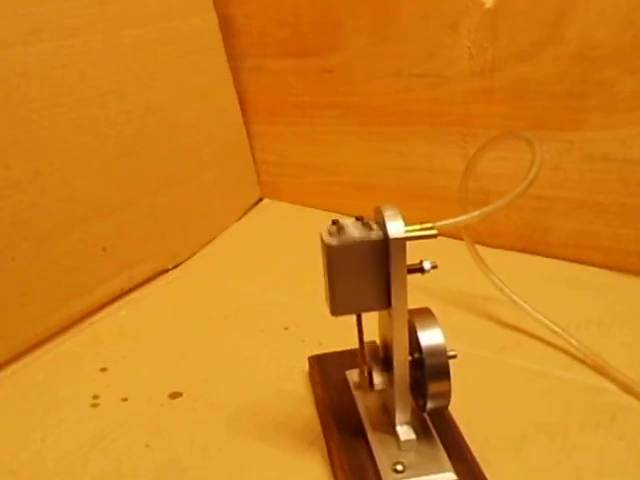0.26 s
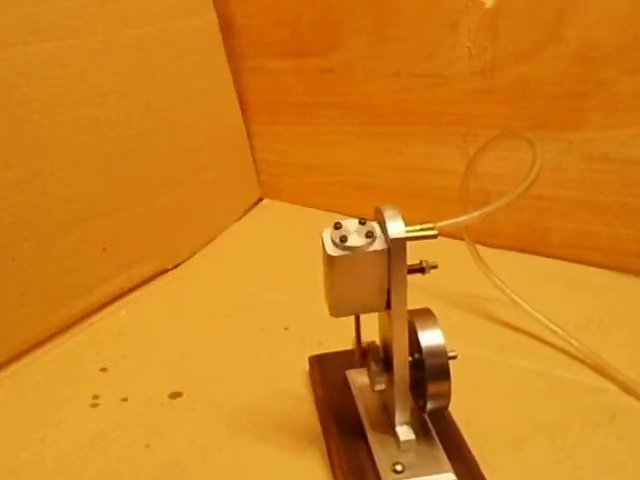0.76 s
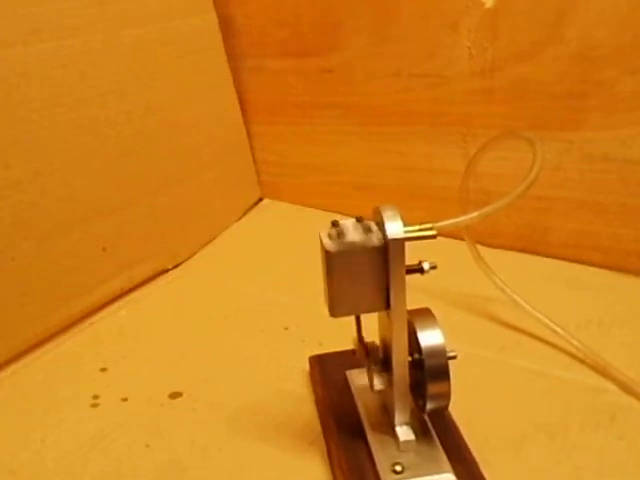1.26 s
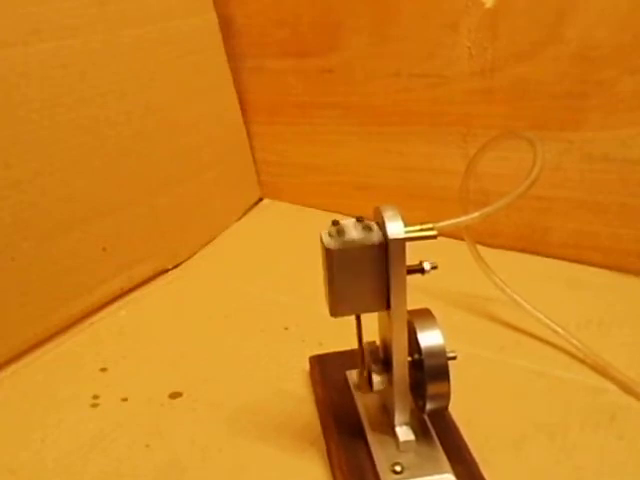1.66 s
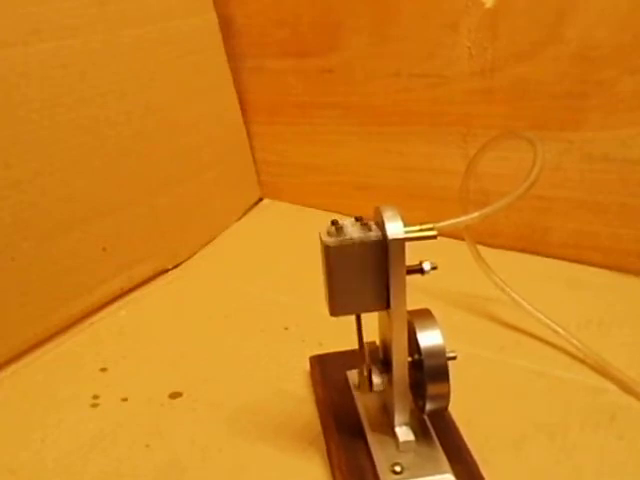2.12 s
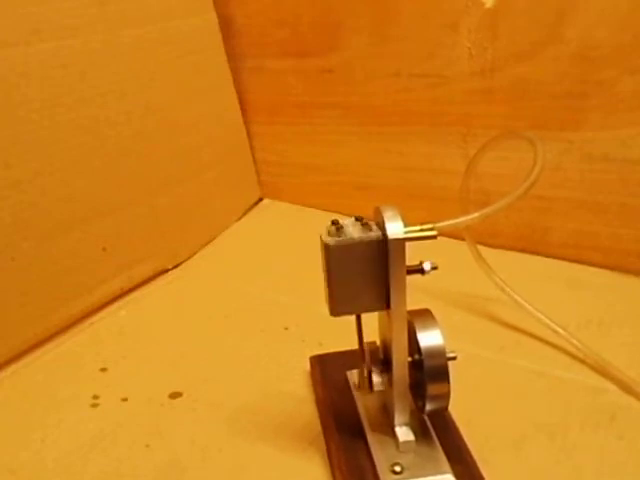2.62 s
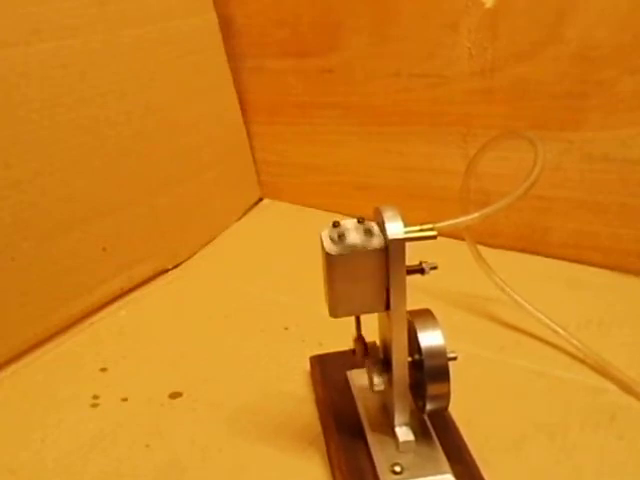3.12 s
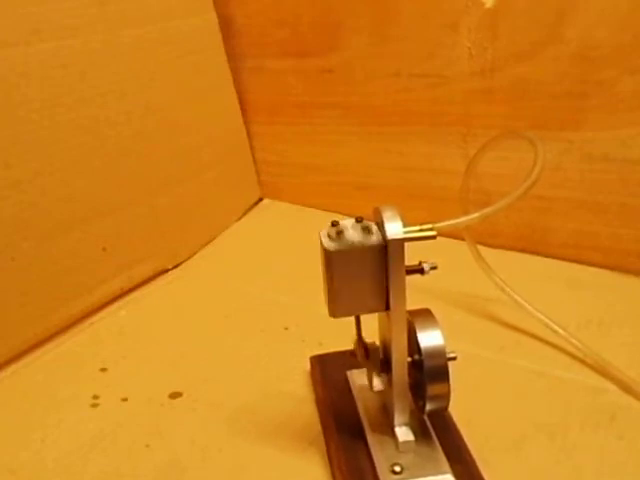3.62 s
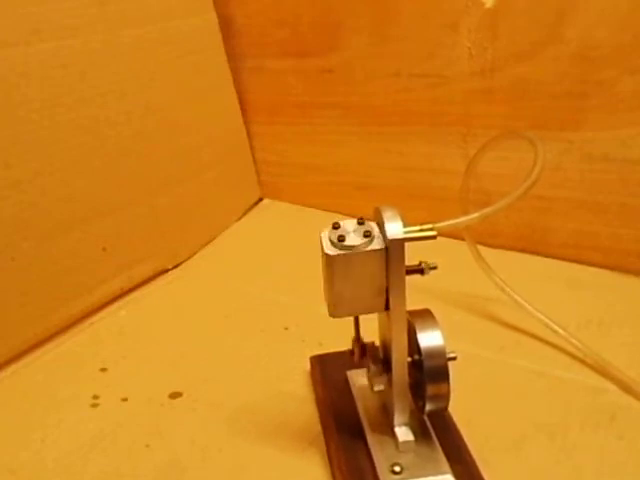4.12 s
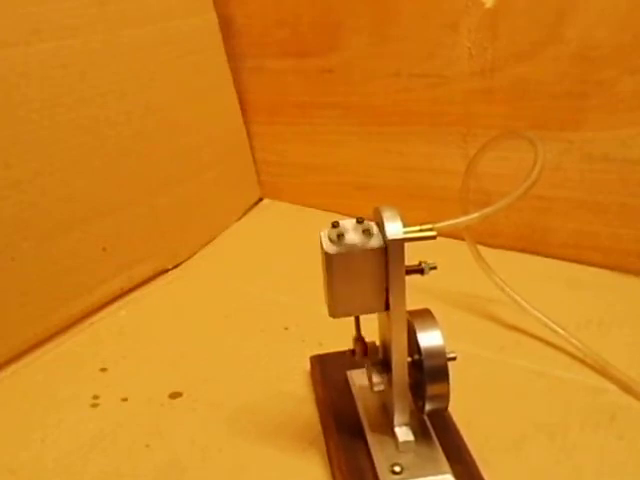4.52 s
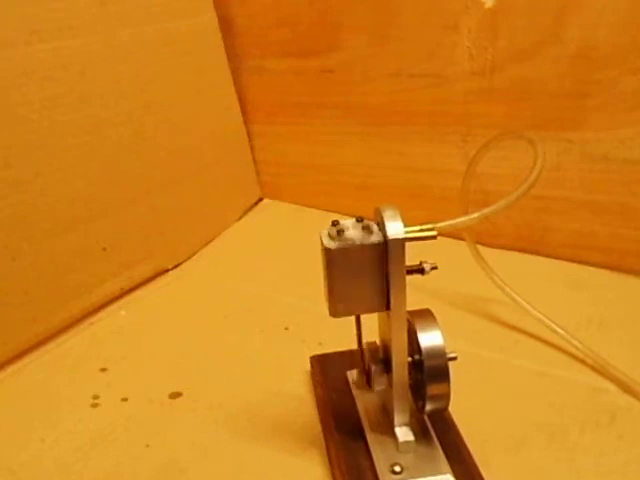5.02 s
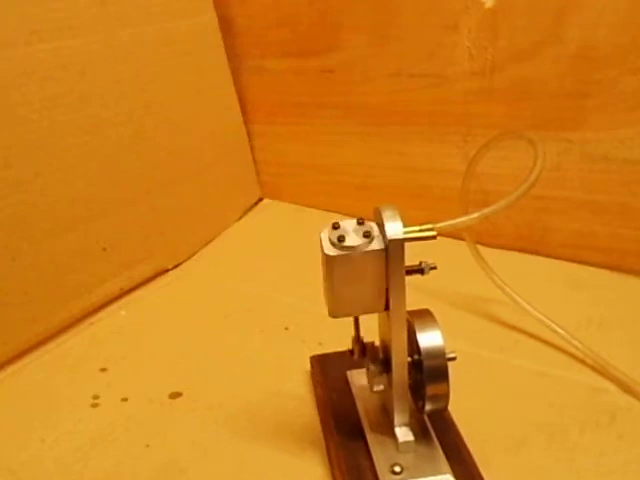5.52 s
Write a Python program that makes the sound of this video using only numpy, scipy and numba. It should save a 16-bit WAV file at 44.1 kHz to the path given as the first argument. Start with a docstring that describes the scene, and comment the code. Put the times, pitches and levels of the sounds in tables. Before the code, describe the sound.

A small metal steam engine runs close to the microphone in a boxed-in wood and cardboard corner. Rapid airy puffs, bright leaking hiss and loose crank clatter blend at nearly nine turns a second. After about two seconds it slows and the hiss weakens, leaving separate knocks and ticks at around five a second. Peaks are crunchy and overloaded; a low rush and faint high whine sit behind.

```python
"""In a corner of wood and cardboard a small oscillating-cylinder steam engine slows from nine to five turns a second.
Steam flow is shaped noise: each turn the exhaust port lets out a puff, and the port face leaks a hiss
whose whistle follows the piston through a moving resonance. The loose crank and pivot knock and tick:
flurries of contacts excite decaying modes. The close microphone overloads on the peaks;
a low rush and a thin steady whine lie behind."""
import sys
import numpy as np
from scipy import signal
from scipy.fft import rfft, irfft
from scipy.io import wavfile
from scipy.ndimage import uniform_filter1d
from numba import njit

SR = 44100
rng = np.random.default_rng(int(sys.argv[2]) if len(sys.argv) > 2 else 0)


def transcribe(signal):
    """Save signal, clipped to [-1, 1], as a 16-bit WAV file at the path in sys.argv[1]."""
    frames = np.atleast_2d(signal).T
    limited = np.clip(frames, -1, 1)
    pcm = np.round(limited * 32767).astype(np.int16)
    wavfile.write(sys.argv[1], SR, pcm)


N = 254456
TIME = np.arange(N) / SR

# strength of the steam, relative levels: time_s, puff_db, leak_db
STEAM_STRENGTH = [(0, -19, -13), (.55, -17.5, -14), (.85, -23, -14), (1.15, -13.5, -14.8),
                  (1.9, -17, -16.3), (2.4, -21, -17), (2.8, -17, -18), (3.25, -21, -21.5), (4.2, -19, -22),
                  (4.8, -24, -22.3), (5.77, -21, -21)]


def exhaust(pace, level_db=14.0, sputter_db=5.0, lag_s=0.0015):
    """Blowdown: the opening port releases turbulent flow, a sputtering puff that comes later at speed."""
    # colour of the puff: frequency_hz, density_db (relative, per Hz)
    puff_spectrum = [(100, -8.5), (500, -26), (900, -5), (1300, -2.5), (2600, -8.5), (4500, -5),
                     (6800, 0.5), (8200, 6), (10000, 5), (12200, 3), (13500, -2), (15800, -4.5)]
    opens, _ = when_crank_reaches(0, 0)
    s, puff_db, _ = np.transpose(STEAM_STRENGTH)
    puffs = np.c_[opens, np.interp(opens, s, puff_db)]
    flow = bursts(strikes(puffs, spread_db=1.4), rise_s=0.0092, hold_s=.010, fall_s=0.0029)
    flow = np.interp(TIME - pace * lag_s, TIME, flow)
    sputter = from_db(level_db + sputter_db * drift(per_s=510))
    return flow * sputter * noise(puff_spectrum)


def leak(turn, pace, level_db=2.0, flutter_db=2.06):
    """Jet noise of the port face; the air space swept by the piston filters a whistle of moving pitch."""
    # leak through one turn, relative levels: turn_share, fast_db, slow_db
    leak_cycle = [(.07, 2.5, 3), (.21, -1.5, -3.5), (.33, -1.5, 0), (.44, 0, .5), (.56, -6, -3.5),
                  (.74, -5.5, -4.5), (.87, -4, -3.5), (.92, -12, -1.5), (.96, -18, -.5), (.985, -1, 3.5)]
    # colour of the leak: frequency_hz, density_db (relative, per Hz)
    leak_spectrum = [(100, -18), (500, -12), (900, -11), (1250, -8), (2250, -8), (2700, -10), (3100, -6),
                     (4000, -8.5), (6800, -3), (8400, 0.5), (10200, 1.2), (12500, 1), (15800, -8)]
    # resonance of the air space that the piston sweeps: turn_share, resonance_hz
    cavity = [(.03, 8300), (.2, 7800), (.4, 8100), (.5, 8550), (.6, 9400), (.68, 10000), (.78, 10250),
              (.86, 9750), (.94, 9200)]
    width_hz, whistle_db = 290, -4.5   # whistle level is relative to the plain hiss

    share, fast_db, slow_db = np.transpose(leak_cycle)
    fast_cycle_db = np.interp(turn, share, fast_db, period=1)
    slow_cycle_db = np.interp(turn, share, slow_db, period=1)
    cycle_db = pace * fast_cycle_db + (1 - pace) * slow_cycle_db
    s, _, leak_db = np.transpose(STEAM_STRENGTH)
    steam_db = np.interp(TIME, s, leak_db)
    flow = from_db(level_db + steam_db + cycle_db + flutter_db * drift(per_s=210))

    cavity_hz = np.interp(turn, *np.transpose(cavity), period=1)
    pole_radius = np.exp(-np.pi * width_hz / SR)
    whistle = moving_resonance(rng.standard_normal(N), 2 * np.pi * cavity_hz / SR, pole_radius)
    return flow * (noise(leak_spectrum) + from_db(whistle_db) * rms_one(whistle))


def knocks(turn, pace, ring_db=-3.5, crack_db=4.5, rattle_db=-20.0, rattles_per_s=140, cushion_hz=2500):
    """Impact in the crank's play excites frame modes, duller near the turn's end; at speed it rattles."""
    # frame and base, relative levels: mode_hz, level_db, t60_s
    frame_modes = [(962, -14.5, 0.03), (1143, -6.7, 0.03), (1321, -8, 0.044), (1423, -4.5, 0.02),
                   (1718, -8, 0.012), (1885, -1, 0.028), (2160, -0.5, 0.0067), (2253, -4, 0.037),
                   (3018, -4.7, 0.024), (3337, -4.5, 0.017), (3855, -11, 0.028), (4570, -11, 0.038),
                   (4680, -9, 0.028), (5370, -32, 0.0091), (5860, -14, 0.017), (7650, 1, 0.0085),
                   (8610, -8, 0.01)]
    # colour of the crack: frequency_hz, density_db (relative, per Hz)
    crack_spectrum = [(80, -5), (400, -7), (1000, 1), (2000, 8), (2700, -1.5), (5000, 9), (8500, -2.5),
                      (11000, -7), (15800, -17)]
    # now and then the crank stays seated through a return and the clatter lets up: time_s
    smooth_returns = [.565, 1.04, 1.155, 1.62, 2.875]
    smooth_s, smooth_db = .024, -20   # about half the length of such a lull, and its depth

    force, envelope = chatter(
        crank_blows(), first_db=-2.5, contacts_per_s=2500, rise_s=0.0012, hold_s=0.0032, fall_s=0.005)
    rattle = (rng.random(N) < pace * rattles_per_s / SR) * rng.standard_normal(N)
    frame = body(force + from_db(rattle_db) * rattle, frame_modes, spread_db=1.5)
    hard = from_db(ring_db) * frame + from_db(crack_db) * envelope * noise(crack_spectrum)

    # a softer contact loses its treble
    soft = signal.sosfilt(signal.butter(1, cushion_hz, fs=SR, output="sos"), hard)
    softness = (.5 + .5 * np.cos(2 * np.pi * turn)) ** 2
    lull = sum(np.exp(-((TIME - s) / smooth_s) ** 4) for s in smooth_returns)
    return from_db(smooth_db * lull) * (hard + softness * (soft - hard))


def crank_blows():
    """Kinematics of play: all knocks of crank and rod, as rows of time_s, level_db."""
    # Each contact made on every turn, with relative levels, lists:
    # flung_turn_share, seated_turn_share, flung_db, seated_db, scatter_s, scatter_db
    # the steam takes up the play in the crank
    push_knock = (.125, .14, -15.5, -28, .003, 2.5)
    # the end of the power stroke
    stroke_knock = (.422, .32, -11.5, -12.3, .001, 1.0)
    # a light touch just before it
    lead_knock = (.31, .2, -22, -33, .002, 3)
    # the rod shakes while it is unloaded
    coast_knock = (.75, .7, -22, -50, .004, 3.5)
    # the end of the return stroke
    return_knock = (.836, .877, -14, -13.3, .0005, 1.0)
    # odd knocks that stand out of the run, relative levels: time_s, level_db
    hard_knocks = [(.141, -4), (.482, -9), (1.335, -11), (1.501, -10.5), (1.533, -6), (1.977, -3),
                   (2.638, -6)]
    # the rod's early shaking gives way to one clean return knock, level changes:
    # time_s, return_knock_db, coast_knock_db
    settling = [(1.3, -8, 2), (1.7, 0, -8)]

    s, return_db, coast_db = np.transpose(settling)
    returns, coasts = every_turn(return_knock), every_turn(coast_knock)
    returns[:, 1] += np.interp(returns[:, 0], s, return_db)
    coasts[:, 1] += np.interp(coasts[:, 0], s, coast_db)
    stroke = [every_turn(contact) for contact in (push_knock, lead_knock, stroke_knock)]
    return np.vstack([*stroke, coasts, returns, hard_knocks])


def ticks(ring_db=0.0, snap_db=3.0):
    """Impact of steel on steel: the cylinder rocks against its pivot and excites short, bright modes."""
    # the cylinder rocks over, relative levels:
    # flung_turn_share, seated_turn_share, flung_db, seated_db, scatter_s, scatter_db
    pivot_tick = (.357, .254, -8, -8.5, .0004, 1.5)
    # odd ticks that stand out, relative levels: time_s, level_db
    hard_ticks = [(1.09, -5), (1.978, -4), (2.039, 1), (2.667, -7)]
    # cylinder and pivot, relative levels: mode_hz, level_db, t60_s
    steel_modes = [(1820, -17, 0.02), (4320, -15, 0.028), (5210, -9.5, 0.0098), (7860, -3, 0.015),
                   (8360, -1, 0.0076), (8640, 3.5, 0.0082), (9140, -2.5, 0.011)]
    # colour of the snap: frequency_hz, density_db (relative, per Hz)
    snap_spectrum = [(200, -23), (1500, -1), (2700, -5), (5000, -2), (6500, -7.5), (8500, 3), (11000, -9),
                     (15800, -10)]
    # the cylinder drops back after rocking over, more strongly at low speed
    rebound_s, rebound_seated_db, rebound_flung_db = .039, -17, -35

    s, flung = when_crank_reaches(*pivot_tick[:2])
    rebound_db = rebound_seated_db + flung * (rebound_flung_db - rebound_seated_db)
    blows = np.vstack([every_turn(pivot_tick), np.c_[s + rebound_s, rebound_db], hard_ticks])
    force, envelope = chatter(
        blows, first_db=5.0, contacts_per_s=2500, rise_s=0.00048, hold_s=0.0013, fall_s=0.0052)
    steel = body(force, steel_modes, spread_db=2.2)
    return from_db(ring_db) * steel + from_db(snap_db) * envelope * noise(snap_spectrum)


def crank():
    """Rotation: share of the turn since the exhaust opened, and pace from 0 (slow) to 1 (fast)."""
    slow_turns_per_s, fast_turns_per_s = 5.2, 6.8
    turns, turns_per_s = turns_done()
    pace = np.clip((turns_per_s - slow_turns_per_s) / (fast_turns_per_s - slow_turns_per_s), 0, 1)
    return turns % 1, pace


def turns_done():
    """Speed integrates to angle: turns since the exhaust first opened, and speed in turns per second."""
    # flywheel speed: time_s, speed_turns_per_s
    flywheel_speed = [(0, 8.794), (0.3, 8.795), (0.7, 8.569), (1.5, 8.459), (2.2, 8.304), (2.45, 7.586),
                      (2.75, 7.566), (3.0, 6.436), (3.3, 6.073), (3.7, 5.667), (4.1, 5.34), (4.5, 5.163),
                      (4.9, 4.994), (5.3, 5.069), (5.77, 4.62)]
    first_opening = .102   # share of a turn before the exhaust first opens
    turns_per_s = np.interp(TIME, *np.transpose(flywheel_speed))
    return np.cumsum(turns_per_s) / SR - first_opening, turns_per_s


def when_crank_reaches(flung_share, seated_share):
    """Inertia shifts contacts: times of a crank angle, and how far loose parts are flung in play (0-1)."""
    seated_turns_per_s, flung_turns_per_s = 6.3, 7.7
    turns, turns_per_s = turns_done()
    whole = np.arange(np.ceil(turns[-1]))
    speed = np.interp(whole + np.round(seated_share), turns, turns_per_s)
    flung = np.interp(speed, [seated_turns_per_s, flung_turns_per_s], [0, 1])
    at = whole + seated_share + flung * (flung_share - seated_share)
    reached = at < turns[-1]
    return np.interp(at[reached], turns, TIME), flung[reached]


def every_turn(contact):
    """Periodic impact with scatter: rows of time_s, level_db for a contact that comes once a turn."""
    flung_share, seated_share, flung_db, seated_db, scatter_s, scatter_db = contact
    s, flung = when_crank_reaches(flung_share, seated_share)
    time_chance, level_chance = rng.standard_normal((len(s), 2)).T
    level_db = seated_db + flung * (flung_db - seated_db) + scatter_db * level_chance
    return np.c_[s + scatter_s * time_chance, level_db]


def chatter(rows, first_db, contacts_per_s, rise_s, hold_s, fall_s):
    """Repeated impact: each blow is a first contact and a short random flurry of further ones."""
    first = strikes(rows, spread_db=0.57)
    envelope = bursts(first, rise_s, hold_s, fall_s)
    contacts = (rng.random(N) < contacts_per_s / SR) * rng.choice([-1, 1], N)
    return from_db(first_db) * first + envelope * contacts, envelope


def body(force, modes, spread_db):
    """Modal superposition: each mode's share of the force wanders as the parts move."""
    total = np.zeros(N)
    for k, (hz, db, t60) in enumerate(modes):
        share = from_db(db + spread_db * drift(per_s=40))
        total += (-1) ** k * ring(force * share, hz, t60)   # alternating polarity
    return total


def ring(force, hz, t60):
    """Damped oscillator: a unit click starts a decaying sine of initial height about 1."""
    r, w = from_db(-60 / (t60 * SR)), 2 * np.pi * hz / SR
    return signal.lfilter([0, np.sin(w)], [1, -2 * r * np.cos(w), r * r], force + 1e-18)


@njit
def moving_resonance(x, angle, r):
    """Time-varying resonance: a two-pole filter whose centre changes from sample to sample."""
    y = np.zeros(len(x))
    for i in range(2, len(x)):
        y[i] = x[i] - x[i - 2] + 2 * r * np.cos(angle[i]) * y[i - 1] - r * r * y[i - 2]
    return y


def strikes(rows, spread_db):
    """Impulse train: one click per row of time_s, level_db, a little stronger or weaker by chance."""
    s, db = np.transpose(rows)[:2]
    clicks = np.zeros(N)
    at = np.clip((s * SR).astype(int), 0, N - 1)
    clicks[at] = from_db(db + spread_db * rng.standard_normal(len(s)))
    return clicks


def bursts(clicks, rise_s, hold_s, fall_s):
    """Convolution: every click becomes an envelope that swells, holds and dies away."""
    t = TIME[:SR // 10]
    shape = np.minimum(t / rise_s, 1) * np.exp(-np.maximum(t - rise_s - hold_s, 0) / fall_s)
    return signal.oaconvolve(clicks, shape)[:N]


def noise(spectrum):
    """Spectral shaping: white noise weighted to the given colour, rms 1."""
    hz, db = np.transpose(spectrum)
    bins = np.maximum(np.fft.rfftfreq(N, 1 / SR), 1)
    weight = from_db(np.interp(np.log(bins), np.log(hz), db))
    return rms_one(irfft(rfft(rng.standard_normal(N)) * weight, N))


def drift(per_s):
    """Random modulation: chance values joined by straight lines, rms 1."""
    knots = rng.standard_normal(int(N / SR * per_s) + 3)
    return rms_one(np.interp(TIME * per_s, np.arange(len(knots)), knots))


def from_db(db):
    """Level to amplitude: 20 dB is a factor of ten."""
    return 10 ** (np.asarray(db) / 20)


def rms_one(x):
    """Normalisation by mean power."""
    return x / np.sqrt(np.mean(x ** 2) + 1e-20)


def corner(x, tail_db=-15.0, t60=0.086):
    """Reflection: close surfaces answer within milliseconds; the room adds a faint, decaying tail."""
    # reflections from table and walls: delay_s, gain (amplitude ratio)
    reflections = [(.0021, -0.2), (.0034, 0.19), (.0058, 0.0021)]
    t = TIME[:SR // 3]
    tail = rng.standard_normal(len(t)) * from_db(-60 * t / t60) * (t > .006)
    response = from_db(tail_db) * tail / np.sqrt(np.sum(tail ** 2))
    response[0] = 1
    for delay, gain in reflections:
        response[int(delay * SR)] += gain
    return signal.oaconvolve(x, response)[:N]


def low_rush(pace, slow_db=-41.0, fast_db=-34.0):
    """Broadband low-frequency noise whose level grows with the engine's pace."""
    # colour of the rush: frequency_hz, density_db (relative, per Hz)
    rush_spectrum = [(25, -1), (50, -2.5), (82, 2.5), (115, -1), (155, 1), (215, 1.5), (300, -19),
                     (400, -2.5), (700, -12), (2000, -51)]
    return from_db(slow_db + pace * (fast_db - slow_db)) * noise(rush_spectrum)


def thin_whine(hz=14455, rms_db=-39):
    """Pure tone: a steady sine, whose peak is the root of two times its rms."""
    return from_db(rms_db) * np.sqrt(2) * np.sin(2 * np.pi * hz * TIME)


def limiter(x, threshold_db=5.5, release_db_per_s=450):
    """Gain reduction: peaks over the threshold pull the gain down; it recovers at a constant dB rate."""
    over_db = np.maximum(20 * np.log10(np.abs(x) + 1e-9) - threshold_db, 0)
    release_db = release_db_per_s * TIME
    held_db = np.maximum.accumulate(over_db + release_db, axis=-1) - release_db
    return x * from_db(-uniform_filter1d(held_db, size=24, axis=-1))


def scene():
    """Superposition: the engine with its reflections, over the low rush and the thin whine."""
    turn, pace = crank()
    engine = exhaust(pace) + leak(turn, pace) + knocks(turn, pace) + ticks()
    return (corner(engine) + low_rush(pace) + thin_whine())[None]


def record(dry, gain_db=1.0, ceiling=.78, cutoff_hz=15800):
    """Overload: a fast limiter holds the peaks, saturation rounds the rest, and the top is cut."""
    held = limiter(from_db(gain_db) * dry)
    rounded = held / (1 + (held / ceiling) ** 6) ** (1 / 6)
    return signal.sosfilt(signal.ellip(12, .1, 80, cutoff_hz, fs=SR, output="sos"), rounded)


dry = scene()
out = record(dry)
transcribe(out)
```